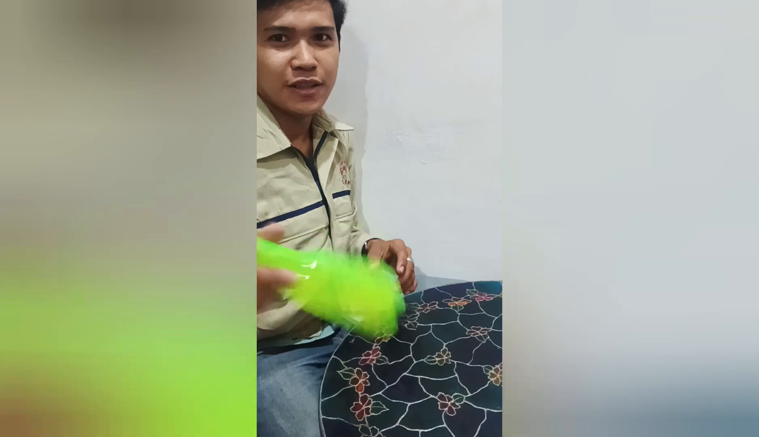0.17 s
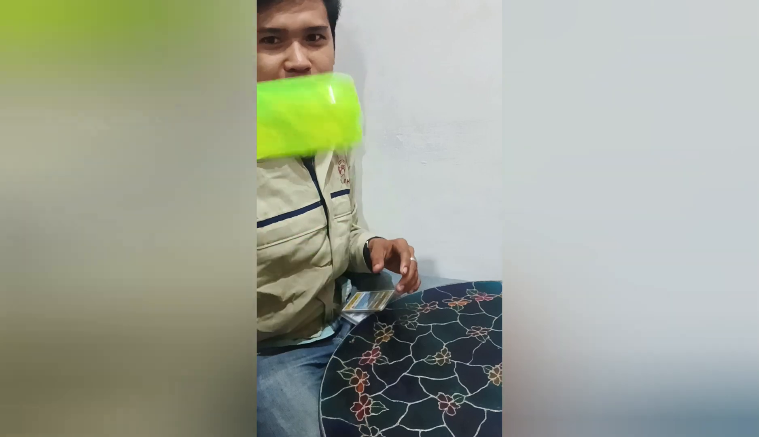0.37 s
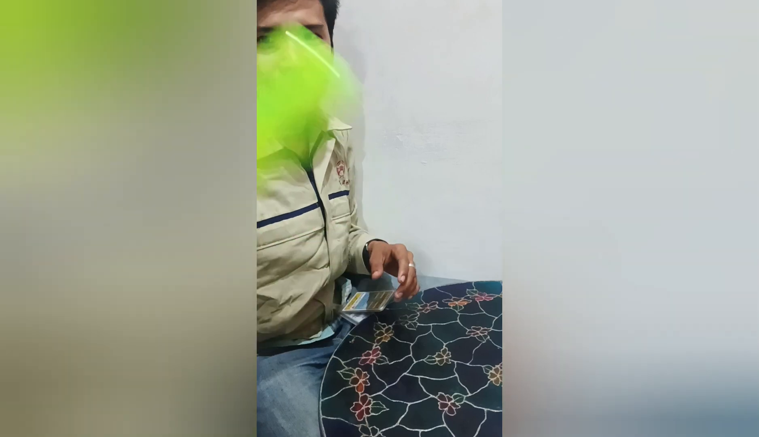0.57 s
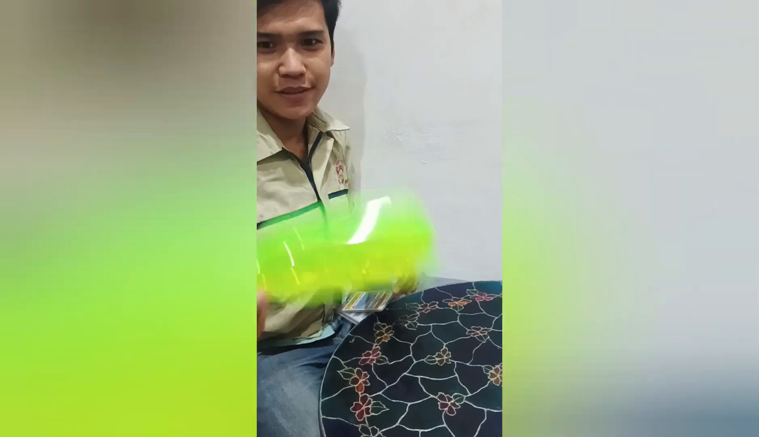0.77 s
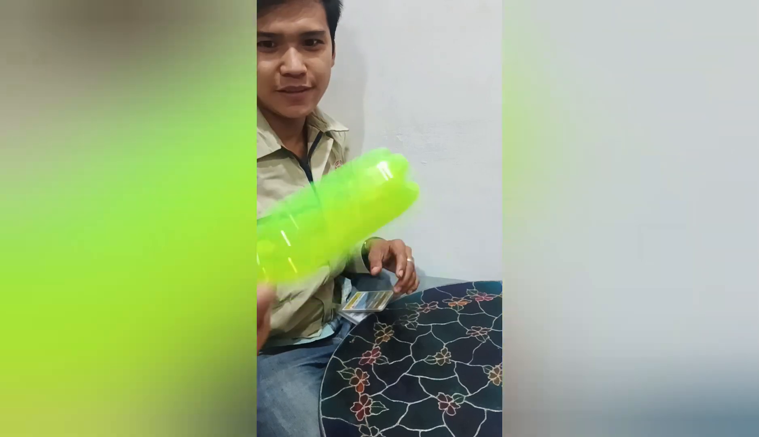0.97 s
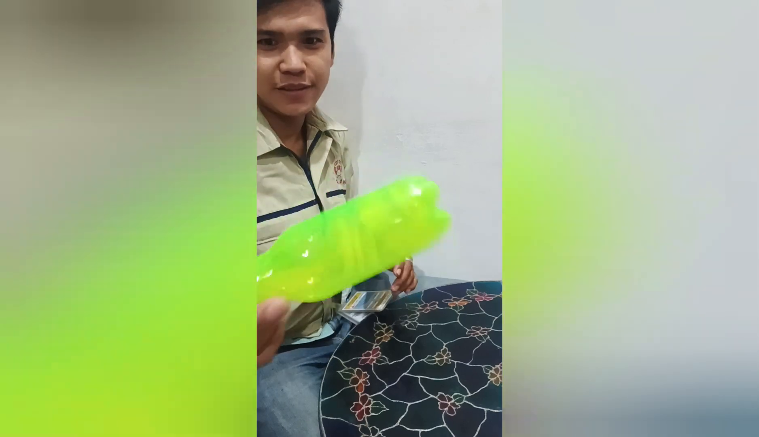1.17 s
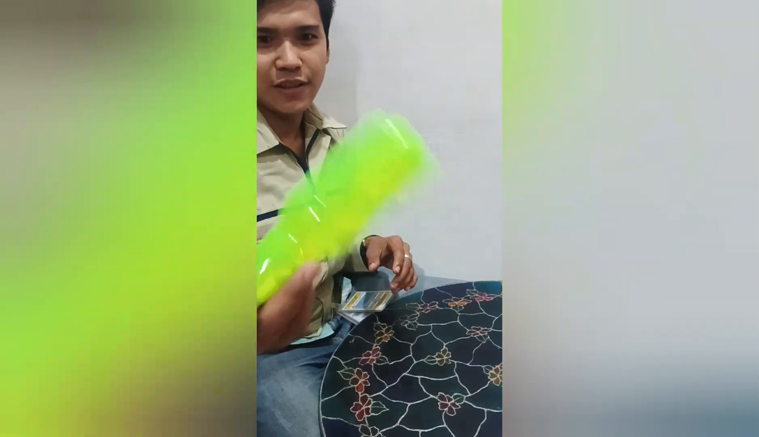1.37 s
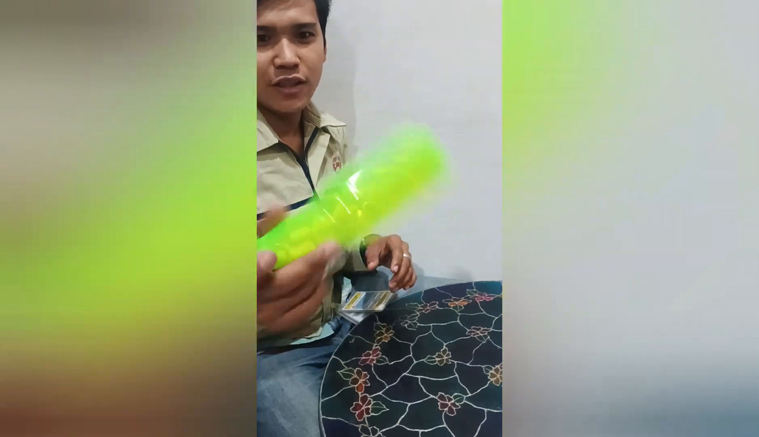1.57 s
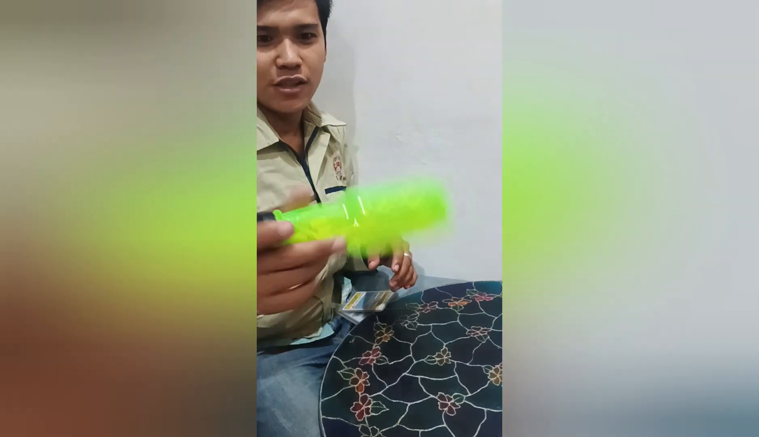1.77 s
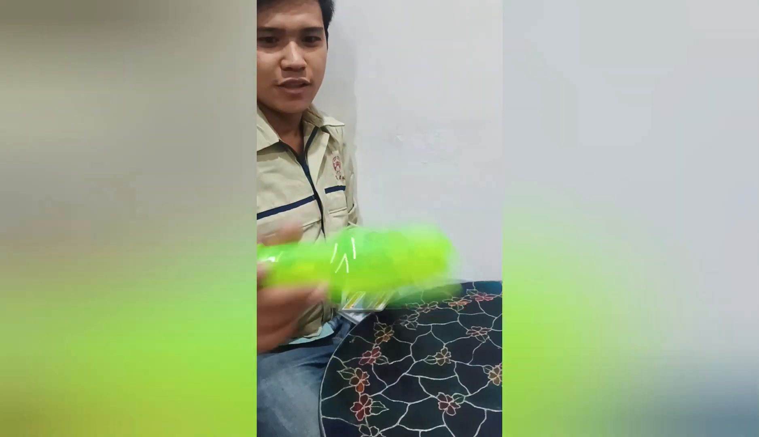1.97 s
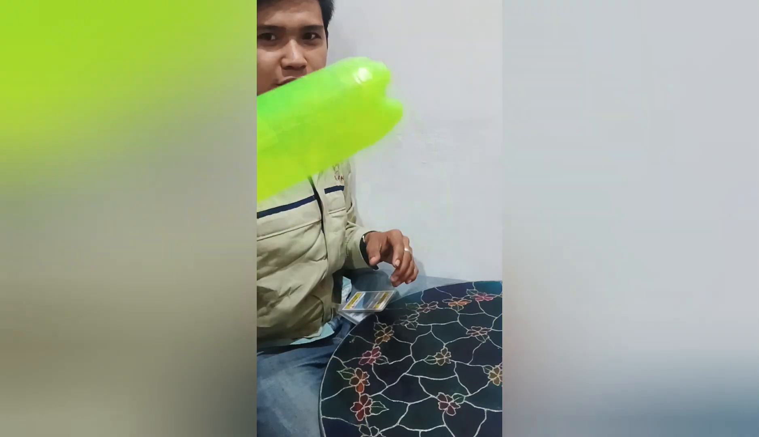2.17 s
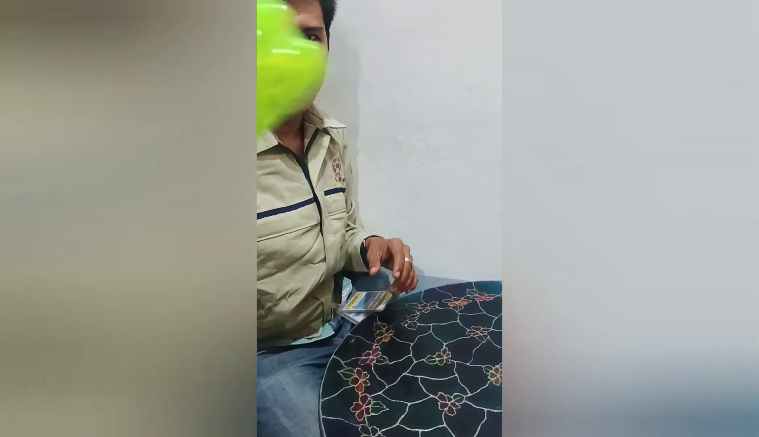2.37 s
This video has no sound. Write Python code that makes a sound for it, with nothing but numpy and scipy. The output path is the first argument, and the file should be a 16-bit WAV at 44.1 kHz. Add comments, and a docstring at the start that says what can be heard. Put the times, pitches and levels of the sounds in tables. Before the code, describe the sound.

A plastic bottle of paper slips is shaken fast throughout; dense rattling loosens into separate clacks with tiny gaps, then gathers again at the end. Close microphone, short room reflections, very faint low hum.

```python
"""Quick volleys of clacks, slaps and ticks over a faint hum: a plastic bottle of folded paper slips, shaken hard close by.
Each volley is a burst of random impulses, filtered by the wall and split into bands for corners and flat faces.
The blows also drive a grainy paper hiss, decaying bottle modes and the short tail of a small room.
Hollow knocks, dull thumps of the handling and a thin lingering ring are added at listed times."""
import sys
import numpy as np
from scipy import signal
from scipy.fft import rfft, irfft
from scipy.io import wavfile

SR = 44100
rng = np.random.default_rng(int(sys.argv[2]) if len(sys.argv) > 2 else 0)


def inscribe(sig):
    """Save sig as 16-bit PCM at rate SR to the path in sys.argv[1].

    A 1-D sig is mono; a 2-D sig holds one channel per row.
    Samples are clipped to [-1, 1] before scaling.
    """
    pcm = np.round(np.clip(np.atleast_2d(sig).T, -1, 1) * 32767)
    wavfile.write(sys.argv[1], SR, pcm.astype(np.int16))


N = 106854
TOP_HZ = 16000  # upper limit of the sound


def undb(db):
    """Logarithmic level: decibels become an amplitude ratio."""
    return 10 ** (np.asarray(db) / 20)


def unit(x):
    """Energy normalization: the sum of squares becomes one."""
    return x / np.sqrt(np.sum(x ** 2) + 1e-18)


def curve(points, hz):
    """Log-frequency interpolation of a response given as (Hz, dB) points."""
    f, db = np.array(points).T
    return np.interp(np.log(np.maximum(hz, 1)), np.log(f), db)


def causal(db):
    """Minimum phase: folding the cepstrum gives the promptest impulse response with this spectrum."""
    cepstrum = irfft(np.log(undb(db)))
    half = len(cepstrum) // 2
    cepstrum[1:half] *= 2
    cepstrum[half + 1:] = 0
    return irfft(np.exp(rfft(cepstrum)))


def band(x, edges, order=4):
    """Band limiting by a Butterworth band-pass."""
    edges = np.clip(edges, 20, SR / 2 - 100)
    return signal.sosfilt(signal.butter(order, edges, "band", fs=SR, output="sos"), x)


def fade(t, t60):
    """Exponential decay: the level falls by 60 dB in t60 seconds."""
    return np.exp(-np.log(1000) * t / t60)


def smooth(x, seconds):
    """Exponential averaging: a one-pole low-pass with this time constant."""
    keep = np.exp(-1 / (seconds * SR))
    return signal.lfilter([1 - keep], [1, -keep], x + 1e-18)


def walk(rate):
    """Random modulation: straight lines join `rate` normal random points a second."""
    t = np.arange(N) / SR
    knots = rng.standard_normal(size=8192)
    return np.interp(t * rate, np.arange(len(knots)), knots)


def shaped_noise(points):
    """Spectral shaping: white noise takes the given (Hz, dB) curve."""
    hz = np.arange(N // 2 + 1) * SR / N
    return irfft(rfft(rng.standard_normal(N)) * undb(curve(points, hz)), N)


def play(rows, voice):
    """Superposition: each row sounds at its start, with levels as energy spread over 10 ms."""
    out = np.zeros(N + SR)
    for start, *row in rows:
        sound = voice(*row)
        i = max(int(start * SR), 0)
        out[i:i + len(sound)] += sound
    return out[:N] * np.sqrt(SR / 100)


# Spectrum of the room noise. Each row: frequency in Hz, relative level in dB.
AIR = [(18, -65), (30, -25), (124, -8.5), (889, -16.5), (2120, -15.5), (3400, -5), (4420, -15.5),
       (5310, -36), (10800, -49), (16000, -54)]
AIR_DB = -58
# Steady low tones. Each row: frequency in Hz, level in dB before the waver.
HUM = [(120, -68.5), (138, -72.5), (240, -78.5), (362, -71), (603, -74.5)]


def background(waver=0.54, drift_rad=1.0, rate=16):
    """Broadband noise and randomly modulated tones: faint room noise and a wavering hum."""
    t = np.arange(N) / SR
    air = shaped_noise(AIR)
    out = undb(AIR_DB) * air / air.std()
    for hz, db in HUM:
        level = undb(db) * np.sqrt(2) * (1 + waver * walk(rate))
        # Phase drift grows with frequency, relative to the third tone
        drift = drift_rad * hz / HUM[2][0] * walk(rate)
        out = out + level * np.sin(2 * np.pi * hz * t + drift)
    return out


SIZE_SPREAD_DB = 0.5  # spread of size between slips


def landings(scatter_ms, count, size=4096):
    """Random impulse train: clicks of uneven size thin out exponentially after the start."""
    clicks = np.zeros(size)
    at = rng.exponential(1, count) * scatter_ms * SR / 1000
    sizes = rng.choice([-1, 1], count) * undb(SIZE_SPREAD_DB * rng.standard_normal(count))
    # Clicks beyond the end are silenced
    np.add.at(clicks, np.clip(at, 0, size - 1).astype(int), sizes * (at < size))
    return unit(clicks)


# Frequency response of the bottle wall. Each row: frequency in Hz, gain in dB.
WALL = [(300, -43), (550, -18.5), (750, -19), (900, -18), (1100, -1), (1420, -1), (1540, -8), (1700, 3.5),
        (1900, -2.5), (2150, 6.5), (2850, -5), (3300, -1), (3850, 10.5), (4450, 10), (5200, -5),
        (6200, -7.5), (7500, -10.5), (9000, -11.5), (10200, -3), (11400, -8), (12500, -23.5), (13800, -39),
        (15000, -7.5), (16500, -38.5)]


def wall_response(hz, colour_db=0):
    """Transfer function: the wall's impulse response, with any extra colour of the struck spot."""
    return causal(curve(WALL, hz) + colour_db)


CLACK_HZ, SLAP_HZ, TICK_HZ = (2350, 5980), (1008, 2430), (6090, 15050)
CLACK_TRIM_DB, SLAP_TRIM_DB, TICK_TRIM_DB = -2, -2, 1.5  # added to the levels of every volley
SLAP_LAG_MS, SLAP_SCATTER = 2.038, 1.8  # flat faces land later and less together than corners
LEAD_DB = 9.5  # first slip over the rest, before wide scatter weakens it
STRAGGLER_DB, STRAGGLER_MS = -12, 10
# Each spot of the wall has its own random colour and a main resonance
SPOT_DB, SPOT_PEAK_DB, SPOT_WIDTH_OCT = 3, 7.5, 0.17
# Bending waves run round the wall and smear each click
SHIVER_T60_S, SHIVER_DB = 0.028, 1


def volley(clack_db, slap_db, tick_db, scatter_ms, spot_hz, size=1024, count=40):
    """Impact excitation: a leading slip, a heap and stragglers drive one resonant spot of the wall."""
    hz = np.arange(size // 2 + 1) * SR / size
    t = np.arange(size) / SR
    spot_points = np.column_stack([np.geomspace(500, TOP_HZ, count), SPOT_DB * rng.standard_normal(count)])
    octaves_away = np.log2((hz + 1) / spot_hz)
    resonance = SPOT_PEAK_DB * np.exp(-(octaves_away / SPOT_WIDTH_OCT) ** 2)
    shiver = undb(SHIVER_DB) * unit(rng.standard_normal(size) * fade(t, SHIVER_T60_S))
    shiver[0] += 1  # the direct click
    prompt = wall_response(hz, curve(spot_points, hz) + resonance)
    wall = signal.fftconvolve(prompt, shiver)[:size]

    corners = landings(scatter_ms, count=10)
    corners[0] += undb(LEAD_DB) / (1 + scatter_ms ** 2)
    faces = landings(SLAP_SCATTER * scatter_ms + 1, count=10)
    faces = np.pad(faces, (int(SLAP_LAG_MS * SR / 1000), 0))[:len(corners)]
    stragglers = undb(STRAGGLER_DB) * landings(STRAGGLER_MS, count=24)

    parts = ((corners, CLACK_HZ, clack_db + CLACK_TRIM_DB),
             (faces, SLAP_HZ, slap_db + SLAP_TRIM_DB),
             (corners, TICK_HZ, tick_db + TICK_TRIM_DB))
    out = 0
    for clicks, edges, db in parts:
        struck = signal.fftconvolve(unit(clicks) + stragglers, wall)
        out = out + undb(db) * unit(band(struck, edges))
    return out


# Volleys of slips on the wall. Each row: start in seconds, clack, slap and tick levels in dB before
# the trims, scatter of the corner landings in ms, resonance of the struck spot in Hz.
VOLLEYS = [(0.002, -37.5, -41.5, -52, 3.74, 3470), (0.029, -38, -47, -53, 2.4, 4470),
           (0.037, -24.5, -41, -43, 1.76, 4980), (0.05, -27.5, -41, -32.5, 1.66, 5600),
           (0.089, -31.5, -33, -43, 2.84, 3980), (0.106, -34, -34, -42, 1, 4850),
           (0.109, -26, -28.5, -32.5, 0.72, 4740), (0.177, -37, -44, -48, 3.4, 3380),
           (0.197, -23, -34, -41.5, 1.6, 4560), (0.205, -30.5, -42, -36.5, 1.0, 3570),
           (0.263, -40.5, -67, -49.5, 1.5, 4250), (0.283, -39.5, -39.5, -50, 3.12, 3750),
           (0.299, -40.5, -55, -53, 1.62, 3360), (0.385, -33, -48, -60, 3.1, 4290),
           (0.498, -39, -42, -48, 2.9, 3500), (0.51, -38.5, -42.5, -41.5, 1.95, 4540),
           (0.535, -43.5, -56, -72, 3.4, 2910), (0.581, -31, -39.5, -37.5, 2.5, 4100),
           (0.59, -29, -33.5, -43, 1.5, 3060), (0.597, -31.5, -56, -28.5, 0.6, 5260),
           (0.619, -31, -47, -52, 0.8, 4380), (0.658, -35, -33, -44, 3.7, 2700),
           (0.669, -25, -31, -33.5, 1.77, 3320), (0.735, -40, -43, -48.5, 1.18, 4120),
           (0.752, -27.5, -48, -47, 2.3, 4370), (0.761, -34.5, -40, -38.5, 0.5, 3420),
           (0.802, -26, -36.5, -39.5, 2.3, 3780), (0.817, -29.5, -34, -32.5, 0.97, 3770),
           (0.831, -27.5, -29.5, -42, 1.76, 3200), (0.844, -35, -53, -45, 1.2, 3040),
           (0.879, -40.5, -48, -48.5, 3.9, 3260), (0.899, -36.5, -41.5, -51, 2.15, 5100),
           (0.944, -36.5, -45, -49, 6.4, 3870), (0.958, -35, -37.5, -43, 3.37, 4860),
           (0.97, -32, -47, -46, 2.9, 4450), (1.028, -38, -46, -64, 2.3, 3100),
           (1.037, -32.5, -39.5, -57, 2.2, 4600), (1.046, -31.5, -48, -43.5, 1.3, 4010),
           (1.053, -29, -36, -38.5, 1.73, 3900), (1.098, -42, -43, -43, 2.46, 4330),
           (1.105, -30.5, -35, -42.5, 2, 4200), (1.117, -32, -42, -66, 1.5, 3500),
           (1.187, -39, -39, -58, 2.2, 3650), (1.203, -22.5, -59, -37, 0.6, 4180),
           (1.249, -26, -38, -44, 1.85, 4100), (1.254, -25, -31, -34.5, 0.91, 3560),
           (1.34, -38, -51, -69, 3, 4230), (1.354, -35.5, -42.5, -50, 2.5, 3330),
           (1.396, -24, -44.5, -37, 0.45, 4900), (1.408, -24.5, -33.5, -45, 0.62, 3660),
           (1.49, -24, -42, -39.5, 0.97, 4380), (1.515, -46, -39, -58, 2.5, 3910),
           (1.555, -31, -34.5, -47.5, 2.48, 3300), (1.645, -42, -58, -58, 2.85, 4680),
           (1.686, -32, -48, -64, 2.7, 4740), (1.695, -25.5, -37, -46, 2.17, 3870),
           (1.786, -52, -40, -79, 4.5, 3160), (1.799, -27, -34.5, -33.5, 2.78, 4760),
           (1.883, -41.5, -48, -65, 1.46, 4340), (1.897, -40, -44, -58, 1.92, 4330),
           (1.982, -37, -74, -75, 0.2, 3850), (2.011, -30.5, -40, -47.5, 2.4, 3920),
           (2.022, -37.5, -40.5, -53, 0.39, 4340), (2.138, -40, -48, -62, 2.72, 2620),
           (2.154, -56, -46, -68, 0.9, 2520), (2.198, -28.5, -56, -55, 0.6, 4270),
           (2.205, -40, -41, -33, 0.66, 4240), (2.227, -33.5, -38.5, -67, 1.52, 3520),
           (2.236, -33.5, -34.5, -66, 0.78, 2900), (2.294, -41, -31, -48, 2.86, 2670),
           (2.301, -24.5, -29.5, -35.5, 1.24, 4100), (2.321, -40, -44, -44, 3.6, 4400),
           (2.359, -45, -42, -62, 6.4, 3350), (2.374, -30.5, -26, -36, 1.96, 2750),
           (2.382, -33.5, -47, -43, 1.5, 3600)]


def volleys():
    """Superposed impacts: every volley sounds at its start."""
    return play(VOLLEYS, volley)


# Hiss of paper on the wall. Each row: frequency in Hz, level in dB relative within its band.
RUSTLE = [(400, -26), (700, -9), (1100, 6), (1500, 4), (2200, 0.5), (3200, -3), (4400, 0.5), (5400, -10),
          (8000, -13.5), (10300, -6), (12800, -23.5), (15000, -22), (16500, -34)]
RUSTLE_SPLITS_HZ = (400, 2400, 6200, 16500)
RUSTLE_DB, RUSTLE_SETTLE_S = -6, 0.011
RUSTLE_GRAIN_DB, RUSTLE_GRAINS_PER_S = 2.5, 900
PRE_RISE_DB, PRE_RISE_S = -13, 0.0022  # a brief soft hiss rises just before each blow


def rustle(hits):
    """Envelope-modulated noise: in each band a grainy hiss swells and dies with the energy of the blows."""
    hiss = shaped_noise(RUSTLE)
    out = 0
    for edges in zip(RUSTLE_SPLITS_HZ, RUSTLE_SPLITS_HZ[1:]):
        power = band(hits, edges) ** 2
        settling = smooth(power, RUSTLE_SETTLE_S)
        # Smoothing backwards in time makes the hiss rise ahead of the blow
        pre_rise = undb(PRE_RISE_DB) ** 2 * smooth(power[::-1], PRE_RISE_S)[::-1]
        grains = band(hiss, edges) * undb(RUSTLE_GRAIN_DB * walk(RUSTLE_GRAINS_PER_S))
        out = out + np.sqrt(settling + pre_rise) * grains / grains.std()
    return undb(RUSTLE_DB) * out


# Modes of the bottle. Each row: frequency in Hz, relative level in dB, decay time t60 in seconds,
# wander of the pitch in percent.
MODES = [(637, -7, 0.6, .6), (817, -5, 0.18, 0.36), (1198.4, -1, 0.14, 0.8), (1434, 2, 0.071, 2.3),
         (1676, -7, 0.13, 1.3), (2130, -1.5, 0.21, 0.56), (2618, 0, 0.053, 1.2), (3070, 5, 0.04, 0.44),
         (3280, -3.5, 0.4, 0.24), (3652, -9.5, 0.11, 0.3), (3660, -8.5, 0.036, 0.78),
         (4330, -2, 0.095, 1.71), (6150, 6, 0.045, 0.51), (8300, 4, 0.045, 0.33)]
RING_DB, FLEX_PER_S = -23.5, 14


def bottle(x):
    """Modal resonance: damped modes ring after each landing and wander in pitch as the wall flexes."""
    ring = 0
    for hz, db, t60, wander in MODES:
        pitch = hz * (1 + wander / 100 * walk(FLEX_PER_S))
        turn = np.exp(2j * np.pi * np.cumsum(pitch) / SR)
        keep = fade(1 / SR, t60)
        # Shift the mode to zero frequency, let it decay there, then shift it back
        mode = (turn * signal.lfilter([1], [1, -keep], x / turn)).real
        ring = ring + undb(db) * np.sqrt(2 * (1 - keep ** 2)) * mode
    return x + undb(RING_DB) * ring


ROOM_DB, ROOM_TREBLE_DB = -9, -1.5  # gain of the whole tail, and of its treble over its low part
ROOM_T60_S, ROOM_TREBLE_T60_S = 0.093, 0.095
ROOM_DELAY_S = 0.001  # the tail is half risen here


def room(x):
    """Reverberation: near walls return a short noise-like tail, decaying almost alike in low and treble."""
    t = np.arange(SR // 2) / SR
    low, high = rng.standard_normal((2, len(t)))
    low_tail = band(low, (100, 3500), order=2) * fade(t, ROOM_T60_S)
    high_tail = band(high, (3500, 18000), order=2) * fade(t, ROOM_TREBLE_T60_S)
    tail = low_tail + undb(ROOM_TREBLE_DB) * high_tail
    tail *= np.clip(t / ROOM_DELAY_S - .5, 0, 1)
    tail /= np.sqrt(np.sum(fade(t, ROOM_T60_S) ** 2))
    return x + undb(ROOM_DB) * signal.fftconvolve(x, tail)[:N]


# Hollow knocks as the whole heap lands flat. Each row: start in seconds, level in dB.
KNOCKS = [(0.037, -40), (0.107, -30.5), (0.75, -43.5), (0.816, -34.5), (0.829, -38), (0.957, -37),
          (0.969, -39.5), (1.1, -39), (1.254, -37), (1.556, -43), (1.642, -50.5), (1.703, -48),
          (1.802, -42), (2.301, -33), (2.378, -43.5)]
KNOCK_HZ, KNOCK_SCATTER_MS = (516, 1175), 4.3


def knocks(size=1024):
    """Collective impact: many flat faces land together and push the wall's low range."""
    wall = wall_response(np.arange(size // 2 + 1) * SR / size)

    def knock(db):
        """Filtered impulses: one heap of landings heard through the wall."""
        struck = signal.fftconvolve(landings(KNOCK_SCATTER_MS, count=30), wall)
        return undb(db) * unit(band(struck, KNOCK_HZ))

    return play(KNOCKS, knock)


# Dull thumps of the handling. Each row: centre in seconds, peak level in dB, length in seconds.
THUMPS = [(0.12, -65.5, 0.078), (0.536, -72, 0.072), (2.144, -56, .05)]
THUMP_HZ = (86, 285)


def handling():
    """Enveloped low noise: dull Gaussian swells from the hand and arm at the big swings."""
    t = np.arange(N) / SR
    low = band(rng.standard_normal(N), THUMP_HZ, order=2)
    swell = sum(undb(db) * np.exp(-(2 * (t - at) / length) ** 2) for at, db, length in THUMPS)
    return low / low.std() * swell


# Swells of a thin ring in the pauses. Each row: start in seconds, level in dB before the partials' own.
LINGERS = [(0.415, -52.5), (0.87, -49.5), (1.6, -77), (2.06, -69)]
# Partials of that ring. Each row: frequency in Hz, relative level in dB.
LINGER_PARTIALS = [(1443, -16), (2767, -3.5), (3248, 2), (4409, -9)]
LINGER_RISE_S, LINGER_T60_S = .015, 0.77


def lingering():
    """Additive synthesis: faint sine partials swell together and decay exponentially."""
    t = np.arange(N) / SR
    level = 0
    for at, db in LINGERS:
        rise = np.clip((t - at) / LINGER_RISE_S, 0, 1)
        level = level + undb(db) * rise * fade(np.maximum(t - at, 0), LINGER_T60_S)
    partials = sum(undb(db) * np.sin(2 * np.pi * (hz * t + rng.random())) for hz, db in LINGER_PARTIALS)
    return level * np.sqrt(2) * partials


def scene():
    """Source, resonator and room in series: blows and rustle excite the bottle, then the room."""
    hits = volleys() + knocks()
    shaken = room(bottle(hits + rustle(hits)))
    return (shaken + lingering() + handling() + background())[None]


def record(dry):
    """Low-pass filtering: a steep elliptic filter cuts the top."""
    return signal.sosfilt(signal.ellip(8, .2, 70, TOP_HZ, fs=SR, output="sos"), dry)


dry = scene()
out = record(dry)
inscribe(out)
```